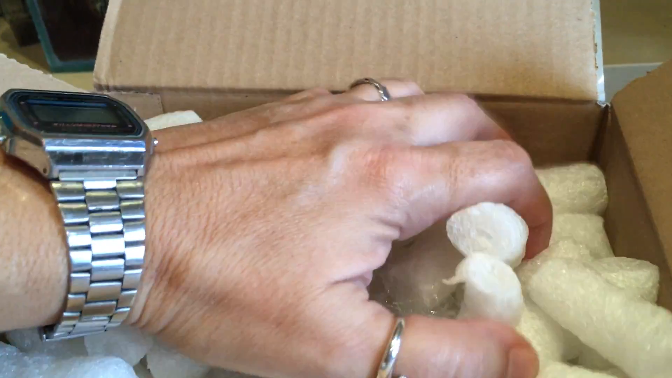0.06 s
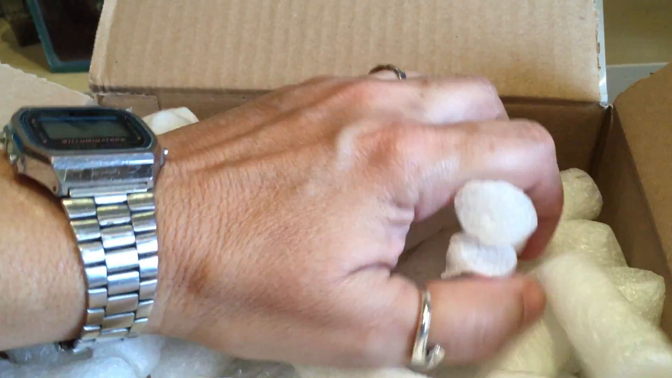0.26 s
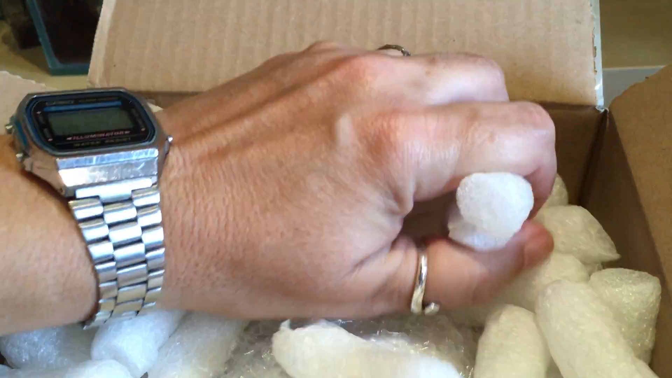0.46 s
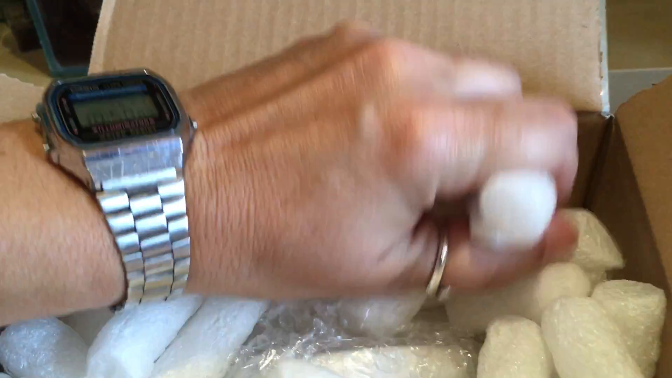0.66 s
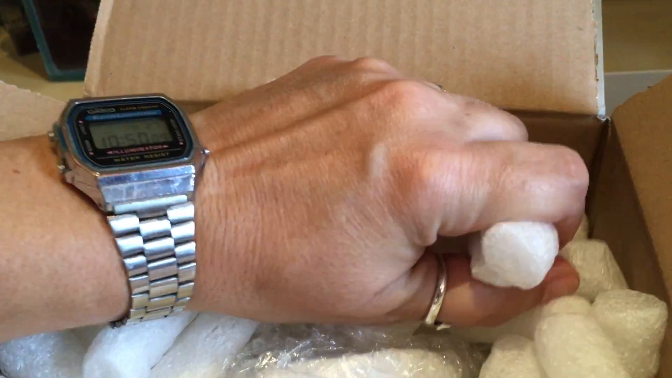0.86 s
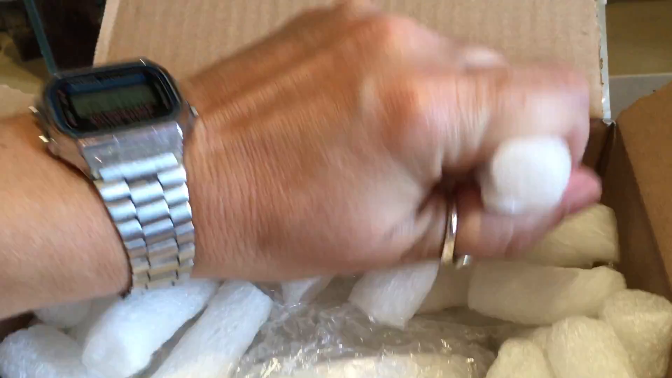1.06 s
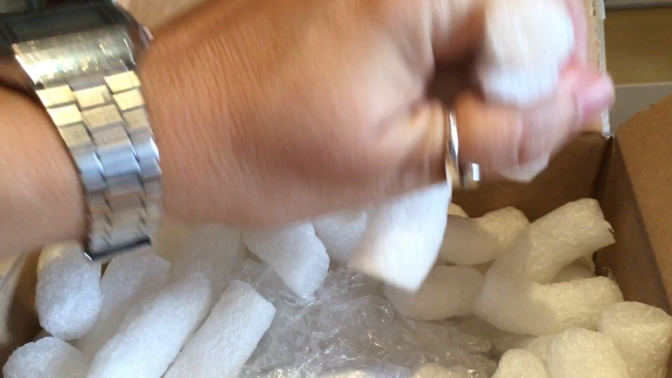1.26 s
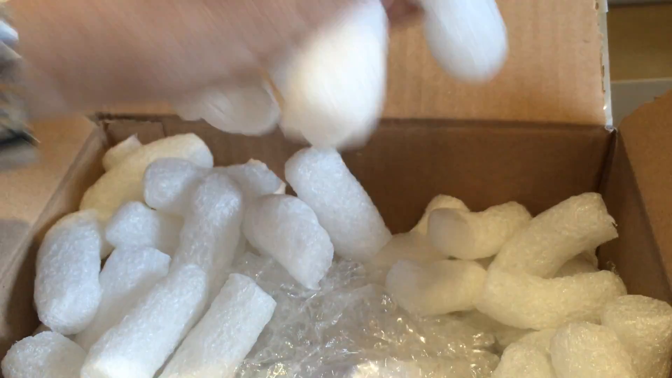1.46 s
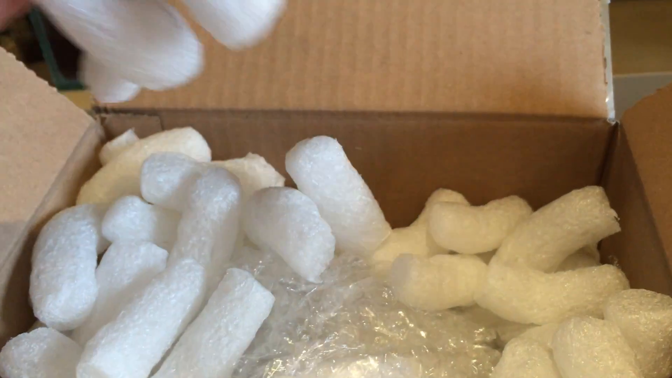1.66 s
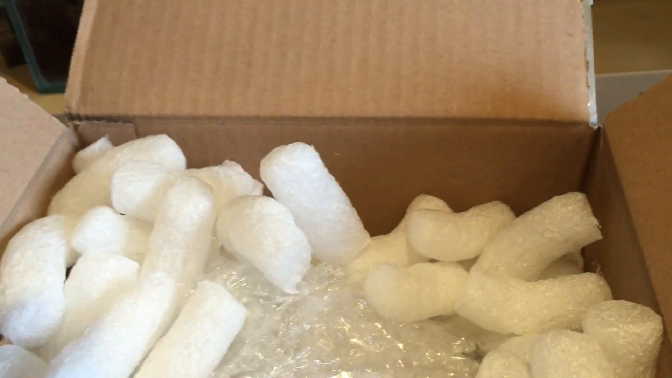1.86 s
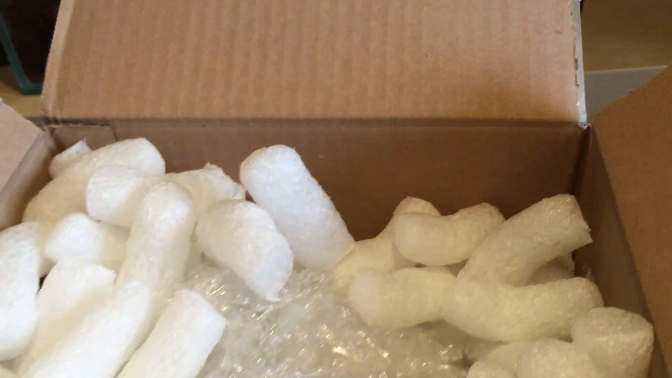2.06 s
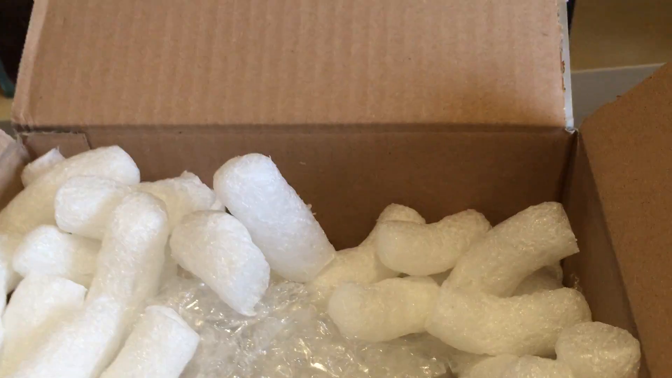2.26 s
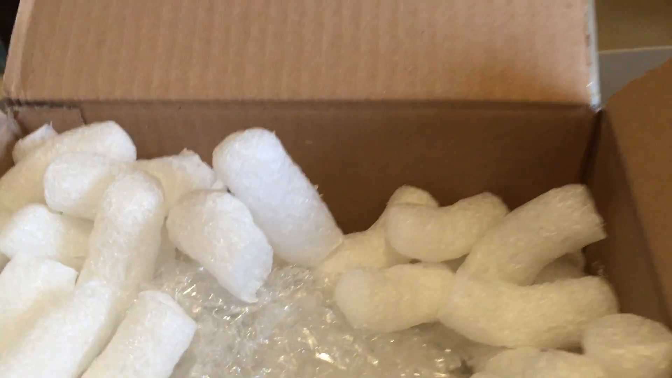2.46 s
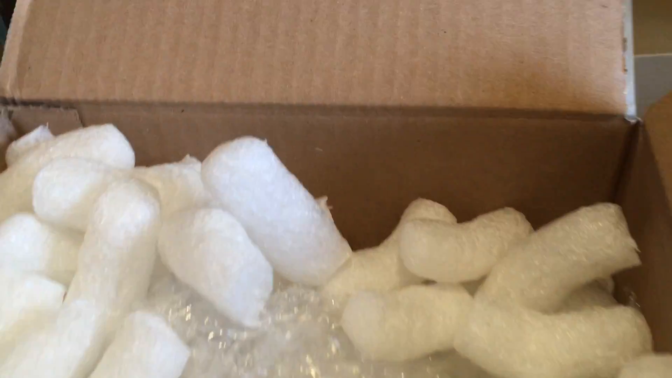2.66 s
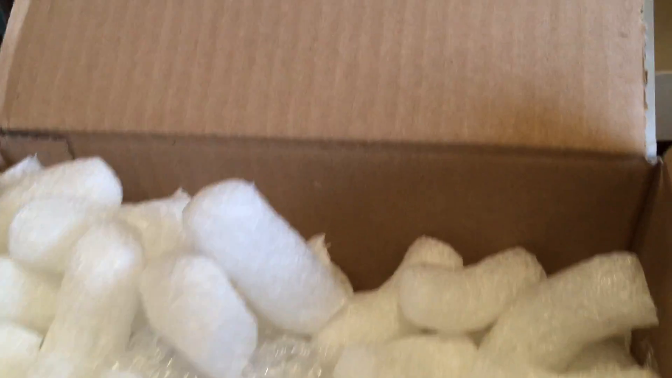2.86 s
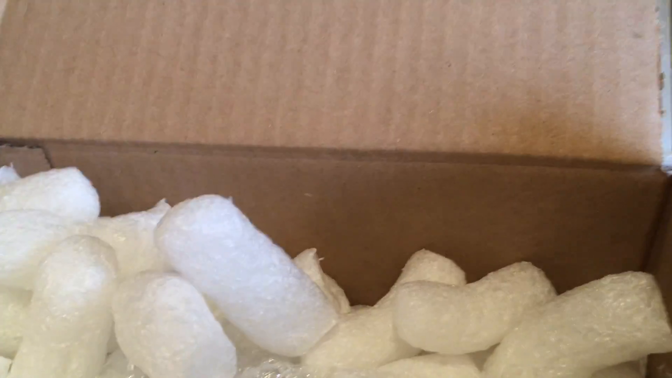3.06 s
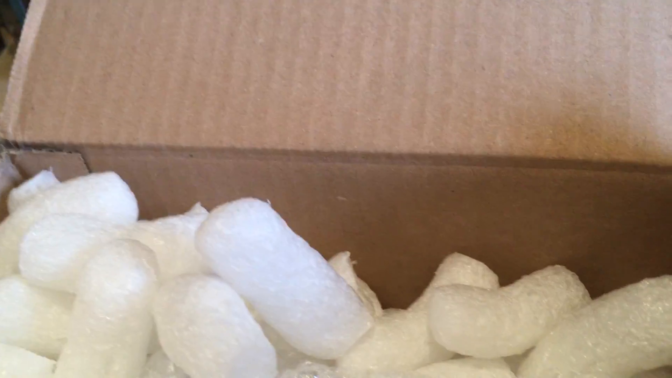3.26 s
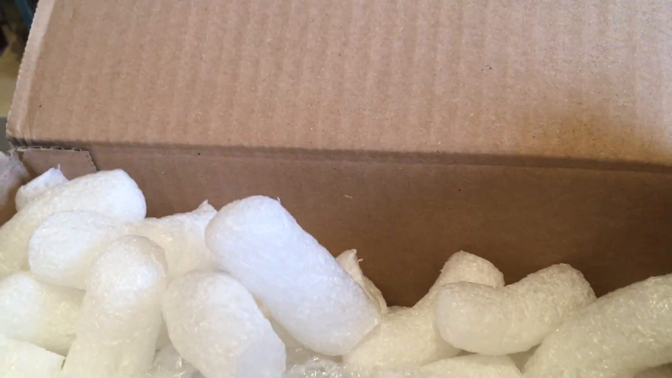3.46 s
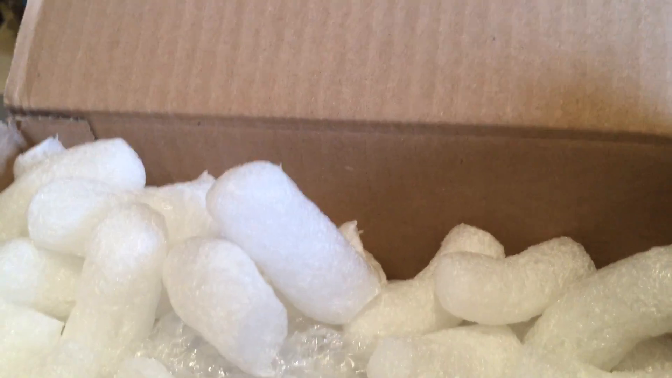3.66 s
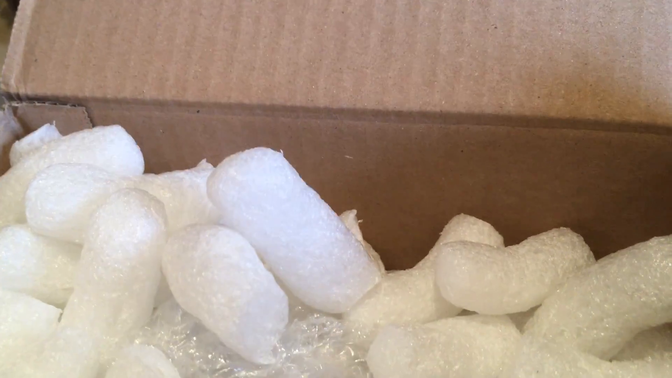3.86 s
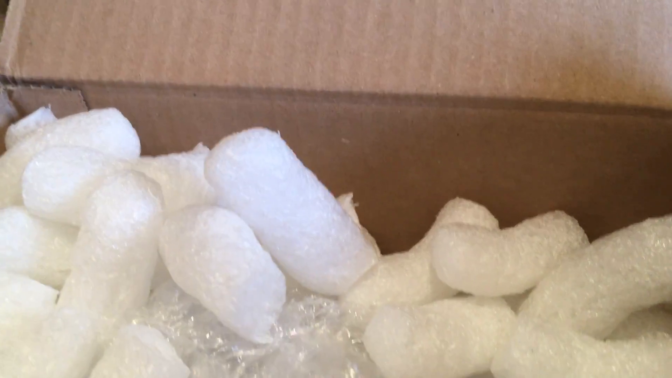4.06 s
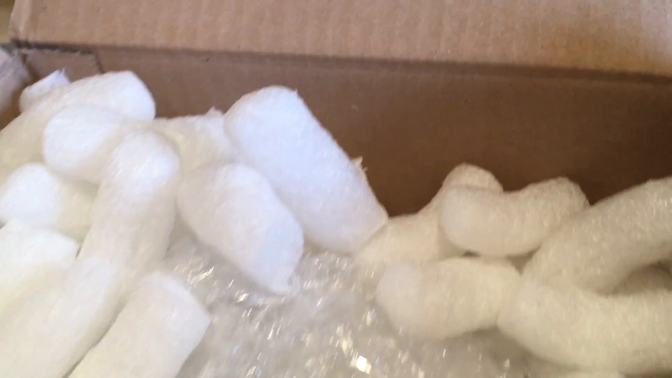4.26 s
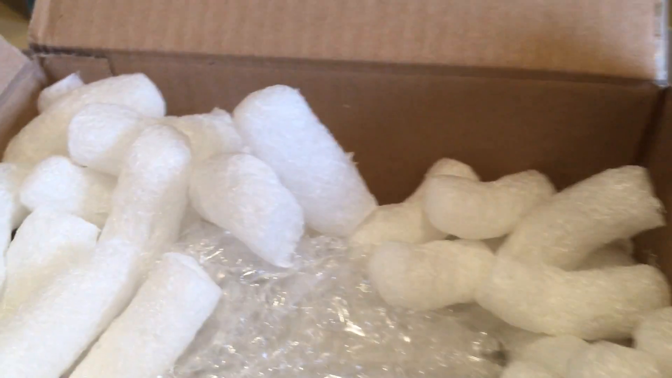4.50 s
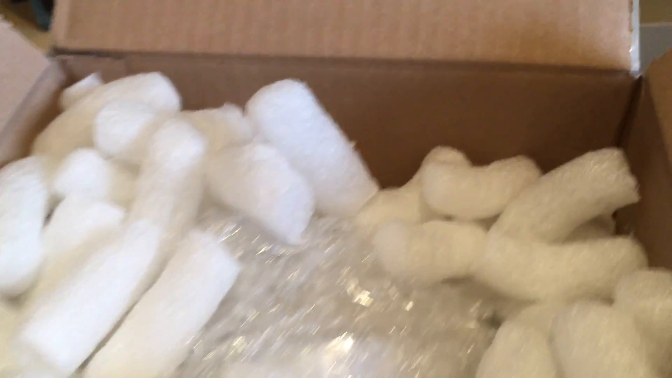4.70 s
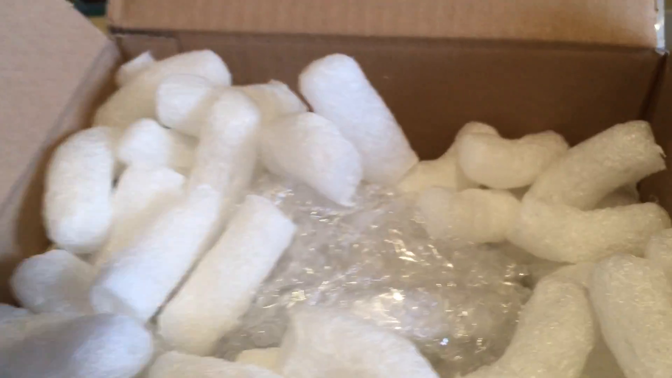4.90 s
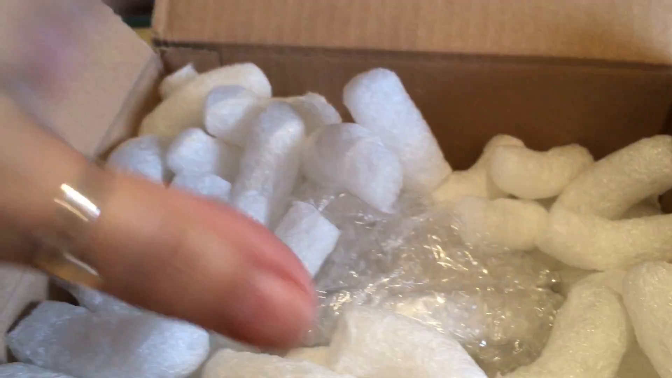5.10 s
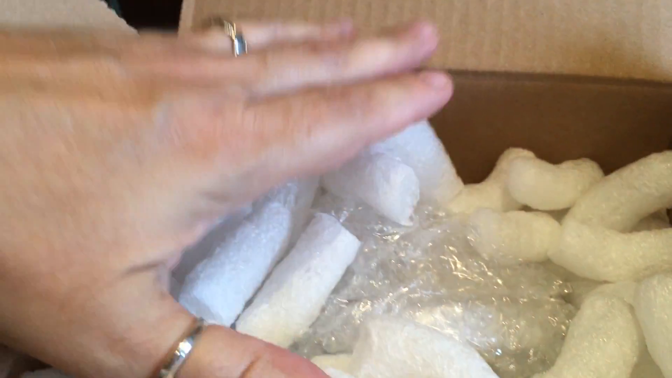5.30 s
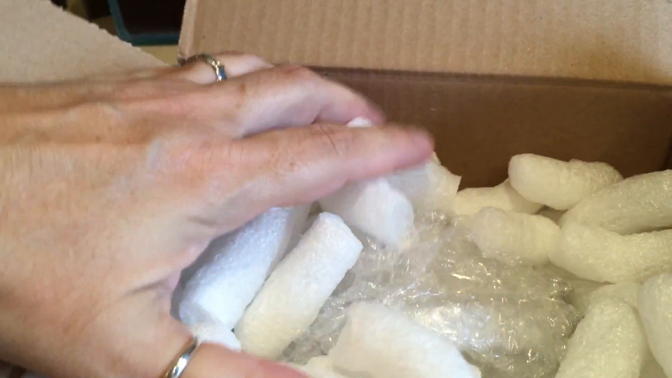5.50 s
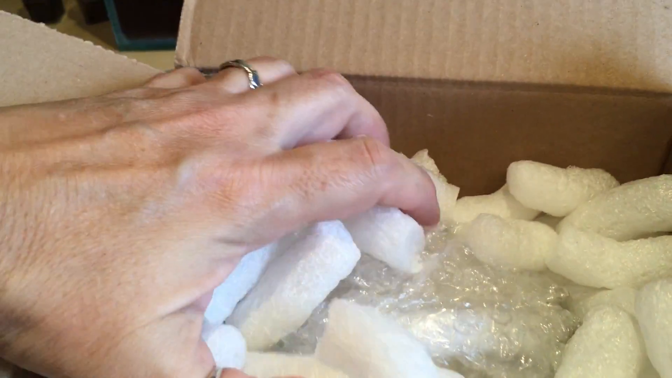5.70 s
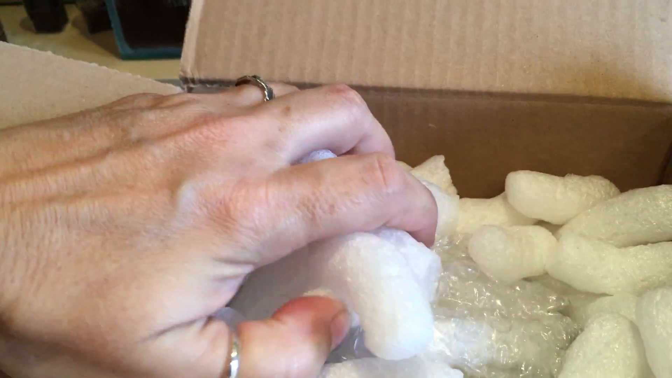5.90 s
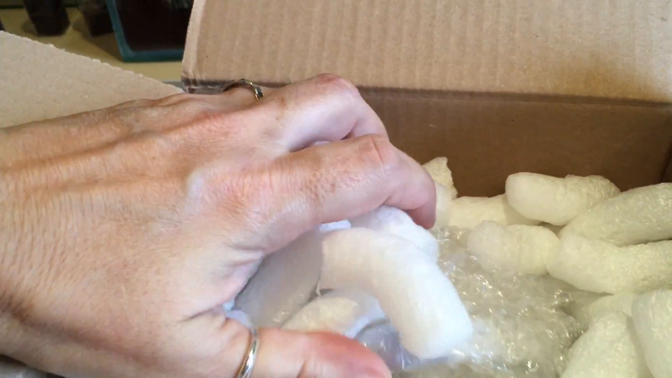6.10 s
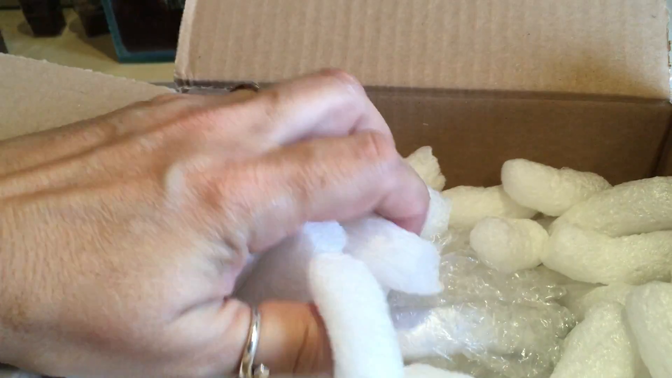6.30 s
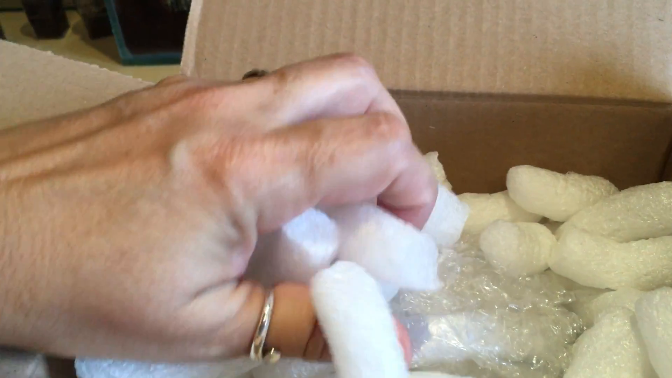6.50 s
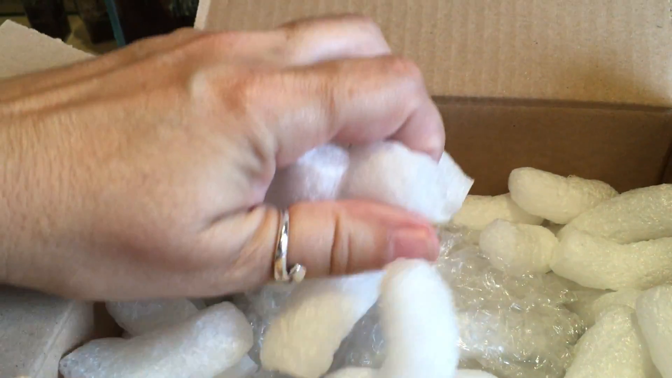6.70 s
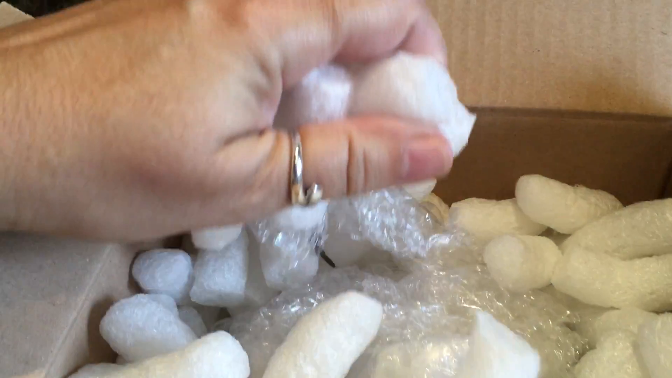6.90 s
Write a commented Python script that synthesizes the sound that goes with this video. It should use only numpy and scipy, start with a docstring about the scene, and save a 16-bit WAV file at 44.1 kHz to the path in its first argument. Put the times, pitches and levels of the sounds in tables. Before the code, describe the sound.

A close, nearly dry indoor sound of foam packing being scooped from a cardboard box. From 0 to about 1.1 seconds, fingers push in repeated short strokes: grainy, bright foam rubbing, crinkling film, a squashed scrunch and tap near 0.4, sharp snaps at 0.3 and 0.63, and a low box rumble. The rubbing dies away by 1.5. Until 5.3 the scene is very quiet: faint fizzy settling, tiny crackles between 1.4 and 2.5, soft hollow bumps around 3.0 to 3.15, and light cardboard ticks and short juddering scrapes from 2.7 to 4.8, the clearest scrape around 3.5. At 5.4 the second scoop starts with a soft thump, growing into vigorous scrunching, with a hard cluster of snaps at 5.9 and more between 6.25 and 6.6, easing by 6.8. Faint room air and a wavering low hum continue underneath.

```python
"""A small room, close by: a hand scoops foam packing peanuts off bubble wrap in a cardboard box.
Two handfuls rub and scrunch (many tiny slips ring the foam), film creases snap, and the box rumbles.
In between, the filling settles with faint slips. Cardboard is tapped (noise bursts), scraped (juddering
slips) and bumped (fading tones). Thin whistles, room air and a wavering hum lie under it."""
import sys
import numpy as np
from scipy import signal
from scipy.fft import rfft, irfft
from scipy.io import wavfile
from scipy.ndimage import uniform_filter1d

SR = 44100
rng = np.random.default_rng(int(sys.argv[2]) if len(sys.argv) > 2 else 0)


def to_wav(s):
    """Save 16-bit WAV."""
    ch = np.atleast_2d(s).T  # columns
    pcm = np.round(np.clip(ch, -1, 1) * 32767)  # PCM
    wavfile.write(sys.argv[1], SR, pcm.astype(np.int16))


N = 306336   # samples in the scene

# Event and push levels are relative: the source functions weight the parts of each sound.
# the hand is in the filling and keeps it rubbing lightly: start_s [s], length_s [s], rub_db [dB]
HAND_IN_FILLING = [(-0.05, 1.117, -45.5), (5.391, 1.4, -49)]
# fingers push into the pieces: start_s [s], length_s [s], rub_db [dB], rumble_over_rub_db [dB]
FINGER_PUSHES = [(-0.03, 0.12, -36, -15), (0.073, 0.089, -42, -5), (0.152, 0.095, -37.5, -14),
                 (0.261, 0.13, -37, -15), (0.436, 0.096, -39.5, -10), (0.602, 0.048, -42, -17),
                 (0.75, 0.072, -41, -9.5), (0.855, 0.099, -42.5, -14), (0.982, .09, -42, -6),
                 (5.384, .11, -49, -2), (5.556, 0.14, -42, -6), (5.682, 0.094, -39.5, -8.5),
                 (5.818, 0.087, -34.5, -13.5), (5.987, 0.09, -45, -5), (6.082, 0.068, -37, -9.5),
                 (6.217, .11, -38, -12), (6.347, 0.099, -37, -21), (6.48, 0.19, -45, -16),
                 (6.74, 0.033, -52.5, -5), (6.83, 0.084, -49.5, -18)]
# loudest snaps of foam and film: start_s [s], level_db [dB], pitch_hz [Hz], crack_over_level_db [dB]
CREASE_SNAPS = [(0.301, -19.5, 7800, -9), (0.6305, -18, 9600, -7.5), (1.3765, -39, 4050, -9),
                (1.492, -40, 2980, -7), (1.5907, -42.5, 3100, -1), (1.7555, -33, 8900, -22),
                (1.773, -35.5, 5370, -27), (1.8016, -43.5, 3200, -5), (1.854, -44, 3020, -1),
                (2.1026, -42, 4400, -14), (2.235, -48, 9500, -4), (2.2962, -41.5, 5900, -12),
                (2.308, -42.5, 2740, -5), (2.432, -46, 5900, -8), (2.478, -38.5, 2040, -3.5),
                (5.914, -14, 3830, -11), (5.9236, -15, 2180, -17), (5.9294, -17, 3400, -14),
                (6.249, -24.5, 2100, -12), (6.3997, -23, 2350, -7), (6.4939, -22.5, 3350, -13),
                (6.5586, -13.5, 7350, -18), (6.5846, -18, 7760, -22)]
# squeezed pieces slip in a rush: start_s [s], length_s [s], level_db [dB]
SQUEEZED_PIECES = [(0.403, 0.0091, -27), (0.624, 0.035, -35), (5.418, 0.02, -37), (5.749, 0.018, -32.5),
                   (5.907, 0.028, -25)]
# the filling shifts by itself: start_s [s], length_s [s], rustle_db [dB], fizz_over_rustle_db [dB]
FILLING_STIRS = [(1.147, 0.56, -67, 11.5), (1.712, 0.25, -66.5, 9), (1.966, 0.23, -68.5, 8.5),
                 (2.227, 0.07, -62.5, 9.5), (2.416, 0.027, -63.5, 2), (2.553, 0.13, -69, 6),
                 (2.655, 0.31, -63, 2.5), (2.915, .13, -59, -1.5), (3.05, 0.11, -56.5, -2),
                 (3.222, 0.1, -60.5, -5), (3.418, 0.28, -60.5, 0.5), (3.76, 0.21, -65.5, 3.5),
                 (4.04, 0.081, -68, 3), (4.23, 0.037, -62, 0), (4.42, 0.14, -67, -5),
                 (4.72, 0.054, -68.5, 5), (4.866, 0.073, -68.5, 0), (5.346, 0.09, -67, 17.5)]
# light taps on cardboard; the first row lends the scrunch at 0.4 s its hollow body: start_s [s], level_db [dB],
# hollow_over_level_db [dB]
CARDBOARD_TAPS = [(0.405, -20, -15), (2.104, -42, -11.5), (2.845, -39, -13.5), (3.274, -36, -12),
                  (3.292, -41.5, -12), (3.435, -37, -23), (3.488, -39, -12.5), (3.75, -41.5, -32),
                  (3.951, -38.5, -19), (4.046, -43, -36), (4.248, -43, -28), (4.2, -38, -19.5),
                  (4.45, -33.5, -15.5), (4.697, -46.5, -23), (4.74, -34.5, -18.5), (5.019, -62, -3),
                  (5.353, -44, -12), (5.4, -33, -9)]
# cardboard drags: start_s [s], length_s [s], level_db [dB], rasp_hz [Hz]
CARDBOARD_DRAGS = [(1.48, 0.16, -71, 950), (2.685, 0.11, -69.5, 1730), (2.85, 0.039, -64, 1050),
                   (3.049, 0.11, -65, 2110), (3.279, 0.048, -62.5, 830), (3.493, 0.17, -55, 1850),
                   (3.848, 0.03, -67.5, 1070), (3.944, 0.037, -66, 1970), (4.132, 0.023, -67.5, 845),
                   (4.447, 0.037, -60.5, 875), (4.504, 0.051, -58, 870), (4.744, 0.031, -82, 700)]
# soft hollow bumps: start_s [s], pitch_hz [Hz], level_db [dB], decay_cycles [cycles]
HOLLOW_BUMPS = [(0.403, 119, -40, 1.3), (.533, 99, -41, 1.9), (2.982, 259, -46, 4.5),
                (3.009, 162.4, -46.5, 6.1), (3.131, 255, -44, 4.5), (3.158, 166.6, -45, 7.1),
                (4.791, 890, -45.5, 3.9), (5.357, 85, -38, 1.6), (5.766, 81, -33.5, 1.3)]
# faint thin whistles: start_s [s], length_s [s], pitch_hz [Hz], level_db [dB]
THIN_WHISTLES = [(2.14, 0.15, 1526, -75.5), (5.02, 0.38, 2870, -87)]
# resonances of the cardboard panels: pitch_hz [Hz], width_hz [Hz], gain_db [dB]
PANEL_RESONANCES = [(221, 80, 4.5), (645, 65, 3.5), (856, 76, 2), (1253, 135, -3.5), (1666, 46, -1),
                    (1970, 150, 1), (2560, 47, -2.5), (3800, 790, -9.5), (5800, 740, -12)]
# tone colour of rubbed foam: pitch_hz [Hz], level_db [relative dB per Hz]
FOAM_COLOUR = [(150, -39.5), (250, 3), (429, 2), (618, 0.5), (1790, -6), (2320, -0.5), (3520, -1),
               (4900, -6), (5830, -1), (9170, -3), (10400, -5), (13700, 1.5), (15200, -0.5), (16000, 2.5)]
# tone colour of the settling filling: pitch_hz [Hz], level_db [relative dB per Hz]
RUSTLE_COLOUR = [(200, -24.5), (400, 7.5), (800, -2.5), (1250, -2), (2000, -4.5), (2900, -5), (4800, -9.5),
                 (6000, -6), (8000, -11), (9600, -5.5), (10600, -10.5), (12000, 0), (15000, -1.5),
                 (16000, 2.5)]
# tone colour of the shaken box: pitch_hz [Hz], level_db [relative dB per Hz]
BOX_RUMBLE_COLOUR = [(20, -4), (40, -21), (67, -4), (92, 0.5), (140, -3), (211, -3.5), (319, -14),
                     (420, -18), (600, -38)]
# tone colour of the room air: pitch_hz [Hz], level_db [relative dB per Hz]
ROOM_AIR_COLOUR = [(15, -37), (30, -18), (60, -3.5), (100, -1.5), (149, -6), (205, -7.5), (280, -14),
                   (363, -16.5), (600, -21.5), (1070, -27), (2400, -32.5), (3200, -28), (4900, -49),
                   (11000, -31.5), (16000, -25)]

AIR_DB = -64.5
HUM_HZ, HUM_DB = 100.3, -67
TOP_HZ, FIZZ_ABOVE_HZ = 15900, 9800
GRIP_ATTACK_S, GRIP_RELEASE_S = 0.01, 0.2
PUSH_ATTACK_S, PUSH_RELEASE_S = 0.038, 0.045
STIR_ATTACK_S, STIR_RELEASE_S = 0.018, 0.062
# fizz and hollow body grow with the rubbing: dB per dB above an ordinary push
ORDINARY_DB, FIZZ_FOLLOWS, BODY_FOLLOWS = -44.5, 0.81, 0.94
# spread of slip sizes: even under the hand, coarse in the freed filling, evening out as it relaxes
PRESSED_SPREAD_DB, FREED_SPREAD_DB, RELAX_S = 2.0, 3, 4.1
BUMP_SWELL_SHARE = 0.22   # of the decay time


def scoops(friction, film, rub_db, fizz_db, body_db, crinkle_db, rumble_db, grip_rumble_db, loaded_body_db):
    """Foam rubs on foam with each push, the film under it crinkles, and the moving load shakes the box."""
    rub_power = 1e-14
    for s, length, db in HAND_IN_FILLING:
        rub_power = rub_power + (from_db(db) * gesture(s, length, GRIP_ATTACK_S, GRIP_RELEASE_S)) ** 2
    load_power = rub_power * from_db(grip_rumble_db) ** 2
    for s, length, db, rumble in FINGER_PUSHES:
        push = (from_db(db) * gesture(s, length, PUSH_ATTACK_S, PUSH_RELEASE_S)) ** 2
        rub_power = rub_power + push
        load_power = load_power + push * from_db(rumble) ** 2
    # both are 1 at the ordinary level
    effort = np.sqrt(rub_power) / from_db(ORDINARY_DB)
    weight = np.sqrt(load_power) / from_db(ORDINARY_DB)

    # hollower when pressed down
    body_level = np.hypot(effort ** BODY_FOLLOWS * from_db(body_db), weight * from_db(loaded_body_db))
    foam = colour(friction, FOAM_COLOUR)
    middle = rms_one(cut(foam, [1400, FIZZ_ABOVE_HZ], "band", order=4))
    fizz = rms_one(cut(foam, FIZZ_ABOVE_HZ, "high"))
    body = rms_one(cut(foam, 1350, "low", order=4))
    rub = effort * (from_db(rub_db) * middle + from_db(crinkle_db) * film)
    rub += effort ** FIZZ_FOLLOWS * from_db(fizz_db) * fizz
    rub += body_level * body
    shake = weight * from_db(rumble_db) * colour(slips(700, 0.95), BOX_RUMBLE_COLOUR)
    return from_db(ORDINARY_DB) * (rub + shake)


def slip_spread():
    """Slips differ most in size just after the first handful is lifted, and even out as the filling relaxes."""
    t = np.arange(N) / SR
    first_start, first_length, _ = HAND_IN_FILLING[0]
    lifted_s = first_start + first_length
    freed = (t > lifted_s) & (t < HAND_IN_FILLING[1][0])
    relaxing = FREED_SPREAD_DB * np.exp(-(t - lifted_s) / RELAX_S)
    return np.where(freed, relaxing, PRESSED_SPREAD_DB)


def slips(per_s, spread_db, size=N):
    """Tiny stick-slip releases at random times, mostly small and a few large; steady mean power."""
    sizes = from_db(spread_db * np.minimum(rng.standard_exponential(size), 6))
    chance = rng.uniform(-1, 1, size)   # decides both when a slip comes and its sign
    clicks = np.copysign(sizes, chance) * (np.abs(chance) < per_s / SR)
    nearby_power = uniform_filter1d(clicks ** 2, size=3000)
    return clicks / np.sqrt(np.maximum(nearby_power, 1e-9))


def foam_cells(clicks, width_hz, count=6):
    """Each slip rings one patch of foam for a fraction of a millisecond, at its own pitch."""
    dealt = rng.integers(0, count, len(clicks))
    pitches = (np.arange(count) + .5) * TOP_HZ / count
    return sum(resonance(clicks * (dealt == k), hz, width_hz) for k, hz in enumerate(pitches))


def contacts(x, low_hz, high_hz, sharpness, boost_db, size=2600, count=330):
    """Pieces touch and part: each contact lends the rubbing a resonance of its own for a moment."""
    out, touch = x.copy(), np.hanning(size)
    for when, pitch in rng.random((count, 2)):
        at = int(when * (N - size))
        hz = low_hz * (high_hz / low_hz) ** pitch
        ring = resonance(x[at:at + size] * touch, hz, hz / sharpness)
        add(out, at / SR, from_db(boost_db) * ring)
    return out


def crinkle(per_s, spread_db, low_hz, high_hz, sharpness, count=9):
    """Creases of the bubble film flip one by one, each ringing a few cycles at its own pitch."""
    clicks, dealt = slips(per_s, spread_db), rng.integers(0, count, N)
    out = np.zeros(N)
    for k, hz in enumerate(np.geomspace(low_hz, high_hz, count)):
        out += resonance(clicks * (dealt == k), hz, hz / sharpness) / np.sqrt(hz)
    return rms_one(out)


def snaps(ring_db, crack_db, knock_db, sharpness):
    """A crease flips: a sharp crack, a brief ring at its own pitch, and a dull knock of the piece."""
    out = np.zeros(N)
    for s, db, hz, crack_rel in CREASE_SNAPS:
        ring = resonance(burst(0.00063, size=512), hz, hz / sharpness)
        crack = cut(burst(0.0003, size=512), 10500, "high")
        knock = cut(burst(0.004, size=512), [600, 2400], "band")
        snap = from_db(ring_db) * rms_one(ring)
        snap += from_db(crack_rel + crack_db) * rms_one(crack)
        snap += from_db(knock_db) * rms_one(knock)
        add(out, s, from_db(db) * snap)
    return out


def scrunches(edge=0.0061):
    """A squeezed piece gives way in a stutter of slips."""
    out = np.zeros(N)
    for s, length, db in SQUEEZED_PIECES:
        force = stroke(length, edge)
        jumps_db = 4.1 * np.repeat(rng.standard_normal(64), 64)   # a new strength every 64 samples
        stutter = slips(12000, 2.0, size=4096) * from_db(jumps_db)
        add(out, s - edge / 2, from_db(db) * force * colour(stutter, FOAM_COLOUR)[:len(force)])
    return out


def settling(friction, film, rustle_db, fizz_db, crinkle_db, rest_db):
    """Released film and foam creep back in short stirs, with a faint crackle."""
    rustle_power = fizz_power = from_db(rest_db) ** 2
    for s, length, db, bright in FILLING_STIRS:
        stir = (from_db(db) * gesture(s, length, STIR_ATTACK_S, STIR_RELEASE_S)) ** 2
        rustle_power = rustle_power + stir
        fizz_power = fizz_power + stir * from_db(bright) ** 2
    crackle = colour(friction, RUSTLE_COLOUR)
    rustle = from_db(rustle_db) * rms_one(cut(crackle, 9040, "low", order=4))
    fizz = from_db(fizz_db) * rms_one(cut(crackle, 8700, "high", order=4))
    return np.sqrt(rustle_power) * (rustle + from_db(crinkle_db) * film) + np.sqrt(fizz_power) * fizz


def taps(tick_db, hollow_db):
    """A dry tick, a brief brush after it, and the ring of the panel."""
    out = np.zeros(N)
    for s, db, hollow in CARDBOARD_TAPS:
        tick_and_brush = cut(burst(0.0039) + 1.4 * burst(0.0067), 820, "high", order=1)
        panel = cardboard(burst(0.0077))
        tap = from_db(tick_db) * rms_one(tick_and_brush)
        tap += from_db(hollow + hollow_db) * rms_one(panel)
        add(out, s, from_db(db) * tap)
    return out


def drags(rasp_db=-5, sharpness=4, edge=.018):
    """Cardboard judders as it slides, ringing the panels and a rasp that belongs to the spot rubbed."""
    out = np.zeros(N)
    for s, length, db, hz in CARDBOARD_DRAGS:
        force, judder = stroke(length, edge), slips(900, 1.1, size=20000)
        rasp = resonance(judder, hz, hz / sharpness)
        sound = rms_one(cardboard(judder)) + from_db(rasp_db) * rms_one(rasp)
        add(out, s - edge / 2, from_db(db) * force * sound[:len(force)])
    return out


def cardboard(x):
    """The panels of the box ring with whatever drives them."""
    out = np.zeros(len(x))
    for k, (hz, width, db) in enumerate(PANEL_RESONANCES):
        out += (-1) ** k * from_db(db) * resonance(x, hz, width)   # signs alternate
    return out


def bumps(overtone=2.6, overtone_db=-17):
    """Soft contacts wake a hollow tone and a weak overtone that swell and fade together."""
    out, t = np.zeros(N), np.arange(SR // 2) / SR
    for s, hz, db, cycles in HOLLOW_BUMPS:
        decay = cycles / hz
        swell = 1 - np.exp(-(t / (BUMP_SWELL_SHARE * decay)) ** 2)
        shape = swell * np.exp(-t / decay)
        shape = shape / shape.max()
        tone = np.sin(2 * np.pi * hz * t)
        upper = from_db(overtone_db) * shape * np.sin(2 * np.pi * overtone * hz * t)
        add(out, s, from_db(db) * shape * (tone + upper))   # the overtone is shaped twice: it is shorter
    return out


def whistles(width_hz=90, edge=.015):
    """Thin, slightly unsteady tones: noise through two narrow resonances."""
    out = np.zeros(N)
    for s, length, hz, db in THIN_WHISTLES:
        force = stroke(length, edge)
        tone = resonance(resonance(rng.standard_normal(SR // 2), hz, width_hz), hz, width_hz)
        add(out, s - edge / 2, from_db(db) * force * rms_one(tone)[:len(force)])
    return out


def room(x, t60, wall_hz, wet_db):
    """Diffuse reflections, duller than the direct sound, die by 60 dB in t60 seconds."""
    tail = cut(burst(t60 / np.log(1000), size=16384), wall_hz, "low", order=1)
    tail = np.concatenate([np.zeros(round(.003 * SR)), tail])   # reflections come 3 ms late
    return x + from_db(wet_db) * signal.oaconvolve(x, tail)[:N]


def background(octave_db=-9):
    """Room air is coloured noise; the hum and its octave waver in pitch and level."""
    air = from_db(AIR_DB) * colour(rng.standard_normal(N), ROOM_AIR_COLOUR)
    phase = 2 * np.pi * HUM_HZ * np.arange(N) / SR + .5 * drift(9)
    hum = np.sin(phase) + from_db(octave_db) * np.sin(2 * phase)
    hum = hum * from_db(4.1 * drift(4.6))
    return air + from_db(HUM_DB) * rms_one(hum)


def from_db(db):
    """Decibels to gain."""
    return np.exp(np.asarray(db) * (np.log(10) / 20))


def rms_one(x):
    """Scale to an average (rms) level of 1."""
    return x / np.sqrt(np.mean(x ** 2) + 1e-20)


def gesture(s, length, attack, release):
    """Rise, hold until the length is over, then die away."""
    t = np.arange(N) / SR - s
    return np.clip(t / attack, 0, 1) * np.exp(-np.clip((t - length) / release, 0, 20))


def stroke(length, edge):
    """A push of the given length with soft edges."""
    t = np.arange(round((length + edge) * SR)) / SR
    return np.clip(np.minimum(t, t[-1] - t) / edge, 0, 1)


def burst(decay, size=8192):
    """A dying rush of noise with energy 1."""
    x = rng.standard_normal(size) * np.exp(-np.arange(size) / SR / decay)
    return x / np.linalg.norm(x)


def drift(rate):
    """Smooth random wander at a typical size of 1, heading for a new value `rate` times a second."""
    knots = rng.standard_normal(4000)
    return rms_one(np.interp(np.arange(N) / SR * rate, np.arange(len(knots)), knots))


def add(out, s, sound):
    """Mix a sound in at a time."""
    at = max(round(s * SR), 0)
    out[at:at + len(sound)] += sound[:N - at]


def cut(x, hz, kind, order=2):
    """Butterworth filter: keeps the lows, the highs or a band."""
    return signal.sosfilt(signal.butter(order, hz, kind, fs=SR, output="sos"), x)


def resonance(x, hz, width):
    """Two-pole resonance, gain about 1 at its pitch."""
    r = np.exp(-np.pi * width / SR)
    drive = x + 1e-18   # the tiny offset keeps the filter off extremely small numbers
    drive[2:] -= x[:-2] - 1e-18
    return signal.lfilter([(1 - r * r) / 2], [1, -2 * r * np.cos(2 * np.pi * hz / SR), r * r], drive)


def colour(x, spectrum, size=4096):
    """Causal (minimum-phase) filter with the given spectrum; rms 1."""
    hz, db = np.transpose(spectrum)
    grid = np.maximum(np.arange(size // 2 + 1) * SR / size, 1)
    gain = from_db(np.interp(np.log(grid), np.log(hz), db))
    # folding the cepstrum forward puts the filter's response after each click, never before
    cepstrum = irfft(np.log(gain))
    cepstrum[1:size // 2] *= 2
    cepstrum[size // 2 + 1:] = 0
    response = irfft(np.exp(rfft(cepstrum)))
    return rms_one(signal.oaconvolve(x, response)[:len(x)])


def scene():
    """Close handling is nearly dry; the cardboard taps and drags carry more room."""
    clumps = from_db(1.18 * drift(110))      # slips come in small avalanches
    friction = foam_cells(slips(7000, slip_spread()) * clumps, width_hz=3800)
    friction = contacts(friction, low_hz=950, high_hz=9170, sharpness=20.0, boost_db=0.0)
    film = crinkle(per_s=260, spread_db=3.5, low_hz=1650, high_hz=11800, sharpness=2.8)
    close = scoops(friction, film, rub_db=-0.5, fizz_db=-0.3, body_db=-9, crinkle_db=-10, rumble_db=2.0,
                   grip_rumble_db=-10, loaded_body_db=-4)
    close += snaps(ring_db=-17.5, crack_db=-2.5, knock_db=-31.5, sharpness=4.1)
    close += scrunches()
    close += settling(friction, film, rustle_db=-1.66, fizz_db=-3.5, crinkle_db=-10, rest_db=-75.5)
    box = taps(tick_db=-28.5, hollow_db=-14.5) + drags()
    near = room(close, t60=0.3, wall_hz=4860, wet_db=-12.5)
    far = room(box, t60=0.26, wall_hz=5900, wet_db=-4)
    return (near + far + bumps() + whistles() + background())[None]


def record(dry):
    """The top is cut steeply."""
    return signal.sosfilt(signal.ellip(12, .1, 80, TOP_HZ, fs=SR, output="sos"), dry)


dry = scene()
out = record(dry)
to_wav(out)
```